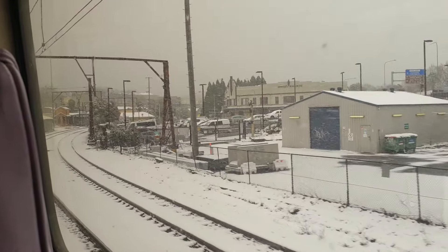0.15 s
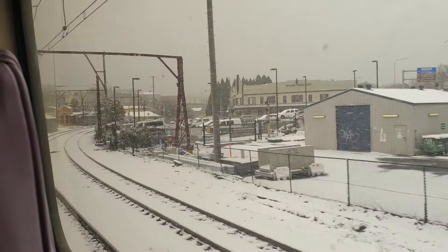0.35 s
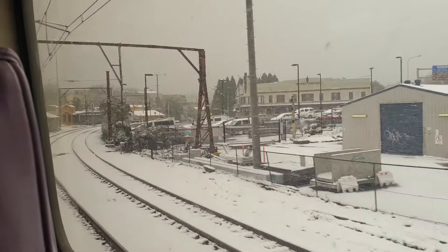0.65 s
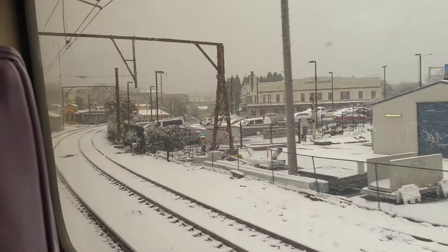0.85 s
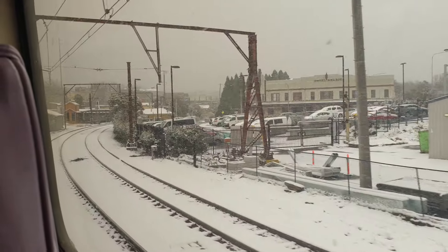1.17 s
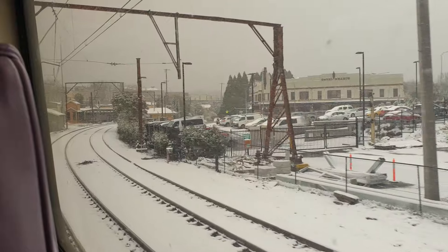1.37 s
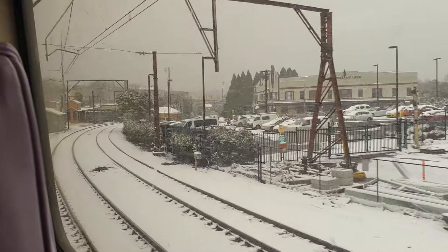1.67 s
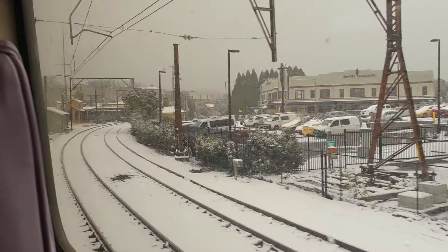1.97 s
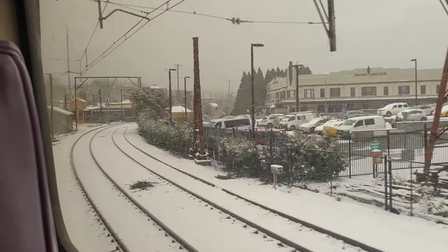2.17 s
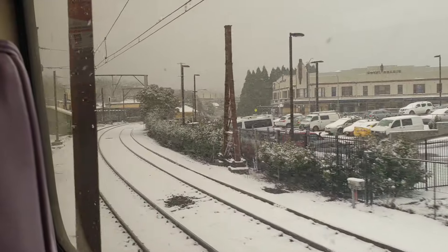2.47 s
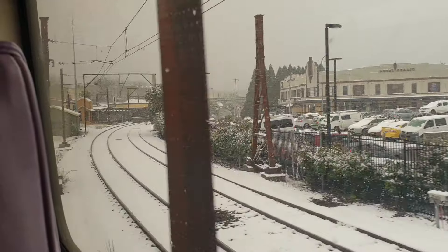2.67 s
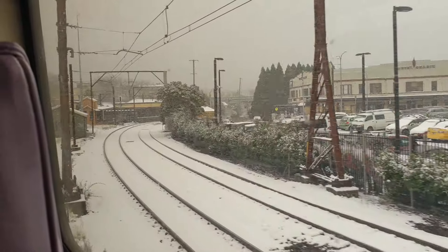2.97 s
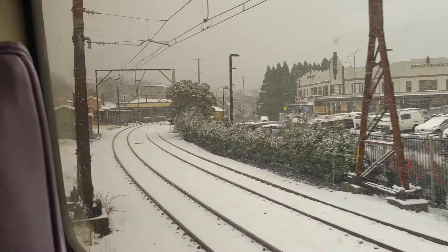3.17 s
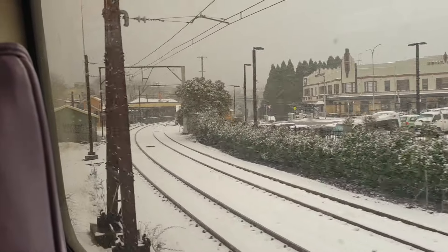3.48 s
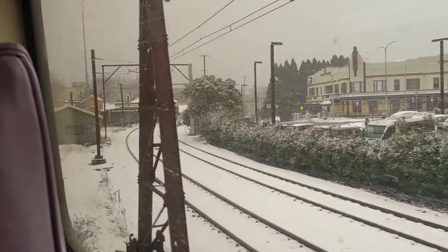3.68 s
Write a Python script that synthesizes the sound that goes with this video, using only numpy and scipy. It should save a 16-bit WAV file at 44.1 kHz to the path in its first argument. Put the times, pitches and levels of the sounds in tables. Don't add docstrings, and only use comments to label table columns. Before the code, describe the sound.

Inside a rail carriage on a curve, a boomy low rumble rolls continuously with constant duct hiss above it. Dull muffled jolts dot the ride, with barely audible metallic fizz, picked up by a phone within the cabin.

```python
import sys
import numpy as np
from scipy import signal
from scipy.fft import rfft, irfft, next_fast_len
from scipy.io import wavfile
from scipy.ndimage import uniform_filter1d

SR = 44100
rng = np.random.default_rng(int(sys.argv[2]) if len(sys.argv) > 2 else 0)


def bounce(signal):
    frames = np.transpose(np.atleast_2d(signal))
    limited = np.clip(frames, -1, 1)
    pcm = np.round(limited * 32767).astype(np.int16)
    wavfile.write(sys.argv[1], SR, pcm)


def nominal_scale(level):
    x = np.asarray(level, float) / 20
    return 10 ** x


N = 168903
SIZE = next_fast_len(N)
HZ = np.arange(SIZE // 2 + 1) * SR / SIZE


def on_log(table, hz):
    t = np.array(table, float)
    return np.interp(np.log(np.maximum(hz, 1)), np.log(t[:, 0]), t[:, 1])


def unit(x):
    return x / np.sqrt(np.mean(x ** 2))


def walk(rate_hz):
    hold = int(SR / rate_hz)
    steps = np.repeat(rng.standard_normal(N // hold + 1), hold)
    slewed = uniform_filter1d(uniform_filter1d(steps, hold), hold)
    return unit(slewed[:N])


def curve(table, column):
    t = np.array(table, float)
    return np.interp(np.arange(N) / SR, t[:, 0], t[:, column])


def colour(table, skirt_db=30):
    hz = np.maximum(HZ, 1)
    octaves_below = np.maximum(np.log2(table[0][0] / hz), 0)
    octaves_above = np.maximum(np.log2(hz / table[-1][0]), 0)
    return nominal_scale(on_log(table, hz) - skirt_db * (octaves_below + octaves_above))


def ringing(modes):
    hz = np.maximum(HZ, 1)
    power = 0
    for f, width, db in modes:
        detune = f / width * (hz / f - f / hz)
        power = power + (nominal_scale(db) / (1 + detune ** 2)) ** 2
    return np.sqrt(power)


# frequency in Hz, left minus right in dB.
PORT_TINT_LOW = [(170, .1), (250, -1.5), (380, 1.5), (520, -.5), (700, -4), (1050, -3), (1250, -.5),
                 (1900, -2)]
# frequency in Hz, left minus right in dB.
PORT_TINT_HIGH = [(1900, 0), (2700, -.5), (3500, 5), (5000, 7), (6800, 11), (8300, 4), (12000, 3),
                  (15500, -6)]
# frequency in Hz, likeness 0-1.
PORT_LIKENESS = [(45, .996), (88, .968), (195, .994), (300, .6), (360, .94), (640, .94), (830, .35),
                 (2500, .15)]


def field(gain):
    shared, own_left, own_right = rfft(rng.standard_normal((3, SIZE)), axis=1)
    like = np.clip(on_log(PORT_LIKENESS, HZ), 0, 1)
    bass_lag_s, treble_lag_s = 0.00005, 0.000364
    lag_from_hz, lag_over_hz = 660, 354
    rise = np.clip((HZ - lag_from_hz) / lag_over_hz, 0, 1)
    lag_s = bass_lag_s + (treble_lag_s - bass_lag_s) * rise
    common = np.sqrt(like) * shared
    left = common + np.sqrt(1 - like) * own_left
    right = common * np.exp(-2j * np.pi * HZ * lag_s) + np.sqrt(1 - like) * own_right
    tint = nominal_scale((on_log(PORT_TINT_LOW, HZ) + on_log(PORT_TINT_HIGH, HZ)) / 2)
    spectra = gain * np.array([left * tint, right / tint])
    return unit(irfft(spectra, SIZE, axis=1)[:, :N])


# frequency in Hz, density in dB per Hz.
VENT_HISS = [(700, -3), (1500, -4), (2000, -2.5), (2900, -4), (3250, -6.5), (5300, -10), (6700, -9),
             (8300, -25)]
# frequency in Hz, density in dB per Hz.
VENT_TOP = [(7000, -24), (8800, -4.5), (11300, -0.5), (12000, -5.5), (13500, -11), (15800, -18)]
# frequency in Hz, width in Hz, level in dB.
DUCT_MODES = [(1176, 50, -1.5), (1300, 40, 1), (1410, 22, -2), (1580, 110, -14), (1886, 390, 6),
              (2450, 300, 1), (2850, 68, -0.5)]


def vent():
    hiss_db, top_db, duct_db, flicker_db = -44, -66, -53.5, 0.09
    top = nominal_scale(top_db + flicker_db * walk(4.1)) * field(colour(VENT_TOP))
    ducts = nominal_scale(duct_db + flicker_db * walk(5.5)) * field(ringing(DUCT_MODES))
    hiss = nominal_scale(hiss_db + flicker_db * walk(4)) * field(colour(VENT_HISS))
    return hiss + top + ducts


# time in seconds, pressure in dB, brightness in dB.
FLANGE_GRIP = [(0, -85, 0), (.17, -88, 0), (.59, -89, -3), (.64, -75, -7), (.7, -92, -3), (1.07, -79, -7),
               (1.13, -67, 0), (1.335, -66, 1), (1.375, -76, 2), (1.58, -69, -3), (1.7, -76, 0),
               (2.35, -67, 0), (2.45, -70.5, -1), (3.0, -66, -3.5), (3.2, -66.5, 2), (3.44, -68, 1),
               (3.52, -75, 2), (3.83, -83, 3)]
# frequency in Hz, density in dB per Hz.
SIZZLE_LOW = [(6000, -8), (8500, -8.5), (11000, -5.5), (12500, -14)]
# frequency in Hz, density in dB per Hz.
SIZZLE_HIGH = [(11500, -5), (12500, 3), (15700, -1)]


def flange():
    grip_db, bright_db = curve(FLANGE_GRIP, column=1), curve(FLANGE_GRIP, column=2)
    low_over_db, high_over_db, flicker_db = 4, -1, 0.4
    low_db = grip_db - bright_db + low_over_db + flicker_db * walk(25.1)
    high_db = grip_db + bright_db + high_over_db + flicker_db * walk(25)
    return nominal_scale(low_db) * field(colour(SIZZLE_LOW)) + nominal_scale(high_db) * field(colour(SIZZLE_HIGH))


# centre in seconds, level in dB, ringing in Hz.
BOGIE_JOLTS = [
    (0.049, -24.5, 118),
    (0.392, -27, 50),
    (1.001, -27.5, 69.6),
    (1.05, -28, 68),
    (1.16, -31, 67),
    (1.425, -25, 118),
    (2.42, -30.5, 62),
    (2.48, -31, 134),
    (2.98, -28, 123),
    (3.3, -30.5, 130),
]


def jolts():
    cycles = 2.2
    t = np.arange(N) / SR
    out = np.zeros(N)
    for (centre_s, level_db, hz), phase_turns in zip(BOGIE_JOLTS, rng.random(len(BOGIE_JOLTS))):
        since_s = t - centre_s
        swell = np.exp(-0.5 * (since_s * hz / cycles * 2) ** 2)
        out += nominal_scale(level_db) * swell * np.sin(2 * np.pi * (hz * since_s + phase_turns))
    return out


# time in seconds, roughness in dB, shift from floor boom to panel drone in dB.
RAIL_ROUGHNESS = [(0, -31, 1.5), (.2, -33.5, 0), (.4, -28.5, 1), (.6, -31, -.5), (.8, -31, -0.5),
                  (1.0, -29.5, -0.5), (1.25, -31, -1), (1.45, -30, 2.5), (1.7, -30.5, 3.5),
                  (1.95, -32, 0.5), (2.2, -31, -0.5), (2.45, -43, -2), (2.7, -30, 4), (2.95, -31, 2.5),
                  (3.15, -32, 5.5), (3.3, -27.5, -2), (3.5, -34, -0.5), (3.83, -34.5, -2)]
# frequency in Hz, width in Hz, level in dB.
FLOOR_MODES = [(25, 8.8, -16), (38.5, 16, -9), (50, 21, -2), (62, 7.2, 0.5), (73.7, 8.2, -1.5),
               (91.4, 29, -4)]
# frequency in Hz, width in Hz, level in dB.
PANEL_MODES = [(117, 18, -1.5), (130, 15.4, -4.5), (146.3, 23, -6)]
# frequency in Hz, density in dB per Hz.
ROLLING_NOISE = [(22, -8), (190, -1), (255, -3.5), (285, -9), (385, -8.5), (600, -14), (830, -20.5),
                 (980, -32.5)]


def rumble():
    rough_db, shift_db = curve(RAIL_ROUGHNESS, column=1), curve(RAIL_ROUGHNESS, column=2)
    floor_over_db, panel_over_db, flicker_db = -2, -5.5, 0.47
    rolling_db = -37 + 0.085 * (rough_db - rough_db.mean())
    floor_db = rough_db + floor_over_db - shift_db + flicker_db * walk(14)
    panel_db = rough_db + panel_over_db + shift_db + flicker_db * walk(13)
    rolling = nominal_scale(rolling_db) * field(colour(ROLLING_NOISE))
    floor = nominal_scale(floor_db) * field(ringing(FLOOR_MODES))
    panels = nominal_scale(panel_db) * field(ringing(PANEL_MODES))
    return floor + panels + rolling


def scene():
    return vent() + flange() + jolts() + rumble()


def band_limit(x):
    return signal.sosfilt(signal.butter(12, 15780, fs=SR, output="sos"), x)


def record(dry):
    return band_limit(dry)


dry = scene()
out = record(dry)
bounce(out)
```